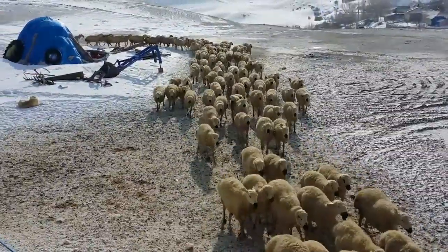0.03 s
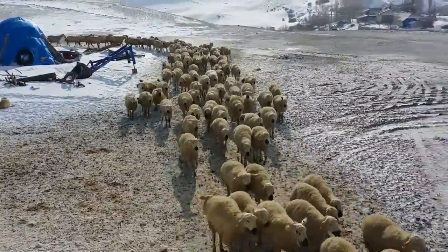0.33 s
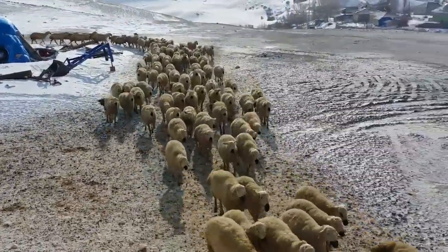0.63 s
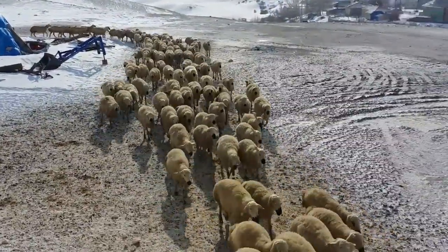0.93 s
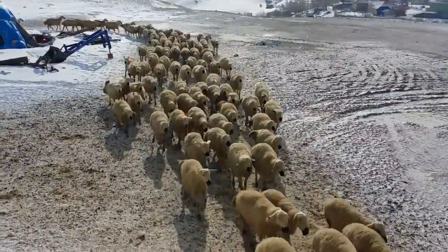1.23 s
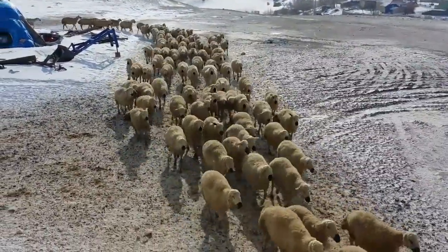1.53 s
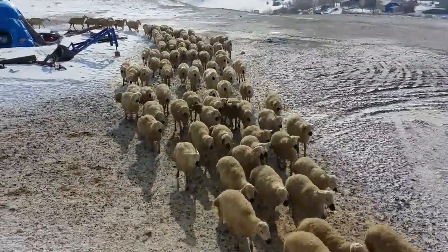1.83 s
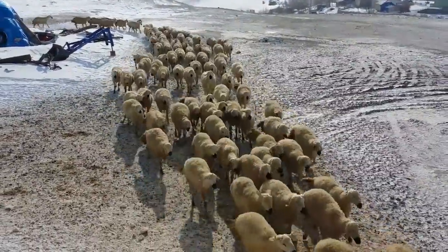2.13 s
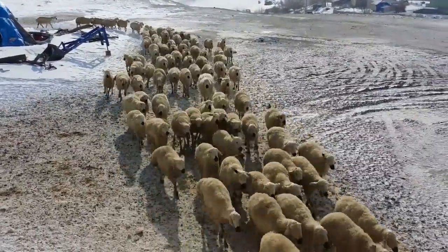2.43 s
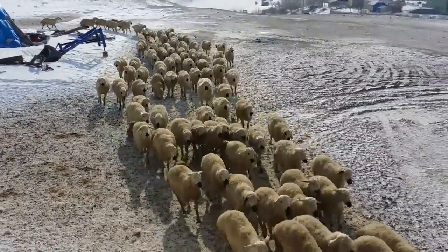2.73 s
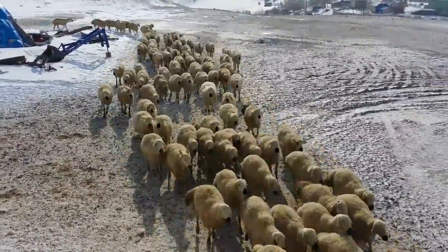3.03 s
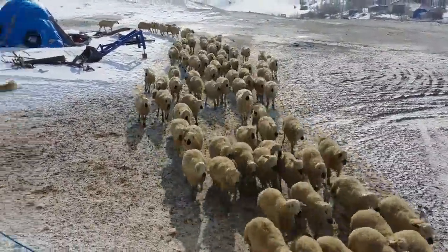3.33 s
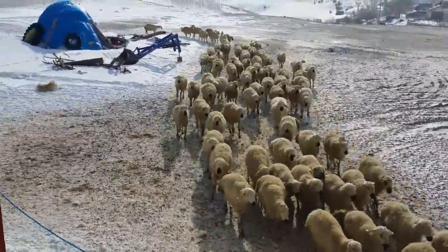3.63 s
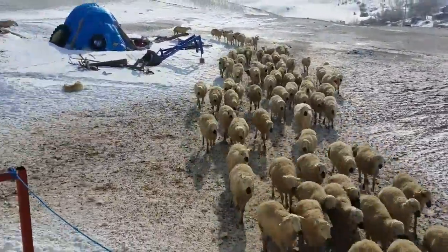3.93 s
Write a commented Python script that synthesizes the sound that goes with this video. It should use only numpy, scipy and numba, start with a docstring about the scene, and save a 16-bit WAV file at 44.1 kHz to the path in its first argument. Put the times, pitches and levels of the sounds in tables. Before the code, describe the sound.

A large flock of sheep walks over frosty, gritty ground for four seconds, making a steady dull patter with a fine crunch and hiss. Closer hooves knock, scuff or flick a stone, mostly between 0.5 and 1 second and again near 3 seconds. Wind rumbles unevenly on the microphone throughout, gusting hard at about 1 second, easing around 2.5 seconds and buffeting again from 3 seconds.

```python
"""Wind rumbles on the microphone while a large flock of sheep patters past on gritty, frosty ground.
Hundreds of hooves merge into a dull patter, a crunch and a fine hiss of crushed grit.
A few near hooves knock, drag or flick a stone. The wind buffets the left and right microphone
openings separately, brighter as it blows harder, with one strong gust near 1 s."""
import sys
import numpy as np
from scipy import signal
from scipy.fft import rfft, irfft
from scipy.io import wavfile
from scipy.ndimage import uniform_filter1d
from numba import njit

SR = 44100
rng = np.random.default_rng(int(sys.argv[2]) if len(sys.argv) > 2 else 0)


def dump(signal):
    """Clip the signal to [-1, 1] and save it as 16-bit WAV at the path in sys.argv[1]."""
    limited = np.clip(np.atleast_2d(signal).T, -1, 1)
    pcm = np.round(limited * 32767).astype(np.int16)
    wavfile.write(sys.argv[1], SR, pcm)


N = 176400  # 4 seconds


def undb(db):
    """Turn decibels into a number to multiply a sound by."""
    return 10 ** (np.asarray(db) / 20)


def unit(x):
    """Scale a signal to an average strength (rms) of 1."""
    return x / np.sqrt(np.mean(x ** 2))


def curve(table):
    """Join rows of (time_s, value) with straight lines."""
    times, values = np.array(table).T
    return np.interp(np.arange(N) / SR, times, values)


def pan(db):
    """Left and right gains with the same total power; positive db leans left."""
    gains = undb(np.array([[.5], [-.5]]) * db)
    return gains / np.sqrt(np.mean(gains ** 2, axis=0))


def colour(x, points):
    """Shape a sound's bass and treble with rows of (pitch_hz, level_db), then scale it to rms 1."""
    hz, db = np.array(points).T
    freqs = np.maximum(np.arange(N // 2 + 1) * SR / N, 1)
    octaves_outside = np.maximum(np.log2(freqs / hz[-1]), 0) + np.maximum(np.log2(hz[0] / freqs), 0)
    gain_db = np.interp(np.log(freqs), np.log(hz), db) - 20 * octaves_outside
    return unit(irfft(rfft(x) * undb(gain_db), N))


def smooth(x, span):
    """Average over span samples, twice."""
    return uniform_filter1d(uniform_filter1d(x, span), span)


def drift(rate_hz):
    """A smooth random wobble, about 1 in size."""
    span = max(int(SR / rate_hz), 2)
    steps = np.repeat(rng.standard_normal(N // span + 1), span)
    return unit(smooth(steps, span)[:N])


def add(out, start_s, sound):
    """Mix a stereo sound in at a given time."""
    i = max(int(start_s * SR), 0)
    out[:, i:i + sound.shape[1]] += sound[:, :N - i]


def stereo(three, shared):
    """Blend one common and two separate signals; shared is the common part of the power."""
    return np.sqrt(shared) * three[0] + np.sqrt(1 - shared) * three[1:]


def band_noise(hz, width, shared):
    """A quarter second of stereo noise around one pitch; more width spreads it further."""
    edges = np.minimum(hz * np.exp(np.array([-.5, .5]) * width), SR / 2 - 1)
    band = signal.butter(2, edges, "band", fs=SR, output="sos")
    noise = signal.sosfilt(band, rng.standard_normal((3, SR // 2)))
    return unit(stereo(noise[:, SR // 4:], shared))


@njit
def lowpass(x, hz):
    """Muffle a sound above a moving pitch (a two-pole filter)."""
    y, band_state, low_state = np.empty(len(x)), 0., 0.
    for i in range(len(x)):
        step = np.tan(np.pi * hz[i] / SR)
        band = (band_state + step * (x[i] - low_state)) / (1 + step * (step + 1.3))
        y[i] = low_state + step * band
        band_state, low_state = 2 * band - band_state, 2 * y[i] - low_state
    return y


# How hard the wind blows: time_s, level_db
WIND_LEVEL = [(0, -37), (.07, -34), (.3, -33.5), (.6, -34.5), (.72, -31.5), (.81, -29.5), (.88, -33.5),
              (.935, -26), (.96, -31.5), (.99, -20.5), (1.03, -29), (1.16, -30), (1.24, -34.5), (1.4, -36),
              (1.46, -33.5), (1.82, -35), (1.9, -33), (2.1, -35.5), (2.4, -35), (2.47, -42.5), (2.72, -42),
              (2.86, -36.5), (3.0, -32), (3.14, -35.5), (3.31, -32.5), (3.48, -31), (3.65, -35),
              (3.87, -33), (4.0, -37.5)]
# Which side it presses harder: time_s, left_minus_right_db
WIND_SIDE = [(0, -1.5), (.55, 3), (.78, 3), (.95, -0.5), (1.15, 1.5), (1.7, -0.5), (2.5, 9.5), (3.2, 0),
             (4.0, 4.5)]
# Tone of the rumble before muffling: pitch_hz, level_db
WIND_COLOUR = [(18, -29), (30, -16), (45, -4.5), (85, 1), (160, -1), (300, -1.5), (700, -24), (2000, -24)]

def wind():
    """Air swirls at each microphone opening: the harder it blows, the louder and brighter the rumble."""
    reference_db, reference_hz, octaves_per_db = -29, 251, 0.17
    sides = []
    for side_gain in pan(curve(WIND_SIDE)):
        swirl_db = 3.5 * np.tanh(drift(rate_hz=45))
        db = curve(WIND_LEVEL) + 20 * np.log10(side_gain) + swirl_db
        cutoff_hz = np.clip(reference_hz * 2 ** (octaves_per_db * (db - reference_db)), 20, SR / 10)
        noise = colour(rng.standard_normal(N), WIND_COLOUR)
        rumble = lowpass(lowpass(noise, cutoff_hz), cutoff_hz)
        strength = np.sqrt(smooth(rumble ** 2, int(.045 * SR)))
        sides.append(rumble / strength * undb(db + 3.5))  # even it out, then set its level
    return np.array(sides)


# Single hard swirls of air hitting the microphone: middle_s, level_db, left_minus_right_db
BUFFETS = [(.144, -18.5, -23), (.252, -14.5, -11), (.455, -17, 19), (.661, -18, 17), (.693, -16.5, 17),
           (.767, -18.5, 7), (.809, -13.5, 7), (.849, -17, 17), (.917, -14.5, -28), (.929, -11, -23),
           (.977, -9.5, -28), (.99, -14.5, 24), (1, -9.5, -38), (1.01, -12.5, 1), (1.049, -13, -15),
           (1.076, -13.5, 23), (1.104, -15, 26), (1.143, -16, 0), (1.326, -17.5, 14), (1.468, -20.5, 6),
           (1.551, -21, -8), (1.728, -18, 7), (1.868, -18.5, 26), (1.895, -14.5, 32), (1.918, -16.5, 23),
           (2.247, -21, 22), (2.381, -20.5, 22), (2.425, -15.5, 29), (2.628, -20.5, 32), (3.03, -13, 20),
           (3.198, -13, 38), (3.305, -15, 22), (3.433, -18, 23), (3.469, -19.5, -5), (3.561, -17.5, 19),
           (3.677, -15, 24), (3.702, -13.5, 15), (3.749, -14.5, -5), (3.811, -15, 9), (3.887, -16.5, 12)]

def buffets():
    """Each hard swirl is a quick push and pull of air; stronger ones are faster and steeper."""
    reference_db, reference_hz, octaves_per_db = -19, 90, 0.1374
    swell_s, steepness = 0.0052, 2.07
    out, half = np.zeros((2, N)), SR // 40
    t = np.arange(-half, half) / SR
    swell = np.exp(-(t / swell_s) ** 2)
    for (middle_s, db, pan_db), turn in zip(BUFFETS, rng.random(len(BUFFETS))):
        hz = reference_hz * 2 ** (octaves_per_db * (db - reference_db))
        phase = 2 * np.pi * (hz * t + turn)
        bend = steepness * undb(db) * swell * np.sin(phase)
        push = swell * np.sin(phase + bend)
        add(out, middle_s - half / SR, undb(db + .5) * pan(pan_db) * push)
    return out


def knocks(table, gain_db, attack_s, decay_s, width, pan_db):
    """Short, dead hits: bursts of noise, each around its own pitch."""
    out, t = np.zeros((2, N)), np.arange(SR // 4) / SR
    shape = np.minimum(t / attack_s, 1) * np.exp(-t / decay_s)
    for start_s, db, hz in table:
        knock = unit(band_noise(hz, width, shared=0.96) * shape) * np.sqrt(np.mean(shape ** 2))
        add(out, start_s, knock * undb(db + gain_db) * pan(pan_db))
    return out


# Small stones clicking: start_s, level_db, pitch_hz
STONES = [(.5741, -31.5, 4870), (1.0116, -31, 4000), (3.083, -36, 7000)]

def stone_clicks():
    """A stone flicked by a hoof gives a tiny, bright click."""
    return knocks(STONES, gain_db=-5, attack_s=0.0011, decay_s=0.0037, width=0.6, pan_db=-1)


def drag(length_s):
    """Pressure of a sliding hoof: it peaks a third of the way into length_s, then eases off."""
    age = np.arange(SR // 4) / SR / length_s * 3
    return age * np.exp(1 - age)


# Hooves dragging through grit: start_s, level_db, length_s, pitch_hz
SCUFFS = [(0.0, -45.5, 0.086, 1810), (0.91, -44, 0.032, 1830), (2.763, -44, 0.092, 1950),
          (3.037, -47.5, 0.1, 1820), (3.427, -42, 0.032, 1900)]

def hoof_scuffs():
    """A dragged hoof makes a narrow rasp with a softer, lower body."""
    out = np.zeros((2, N))
    for start_s, db, length_s, hz in SCUFFS:
        rasp = band_noise(hz, width=0.21, shared=0.19)
        body = undb(-6) * band_noise(hz=1320, width=0.72, shared=0.62)
        add(out, start_s, (rasp + body) * drag(length_s) * undb(db) * pan(4))
    return out


# Hooves crushing frozen grit: start_s, level_db, length_s
SWISHES = [(0, -40.5, .02), (0.633, -51.5, 0.073), (0.908, -49, 0.031), (1.144, -47.5, .07),
           (1.49, -50, 0.059), (1.54, -48, 0.063), (3.034, -45.5, 0.069), (3.44, -49, 0.04),
           (3.598, -51, 0.073)]

def frost_swishes():
    """Frozen grit gives way under a hoof with a crisp swish."""
    out = np.zeros((2, N))
    for start_s, db, length_s in SWISHES:
        swish = band_noise(hz=4350, width=0.4, shared=0)
        fizz = undb(-5.5) * band_noise(hz=9000, width=1.0, shared=0)
        add(out, start_s, (swish + fizz) * drag(length_s) * undb(db) * pan(-1))
    return out


# Near hooves striking the ground: start_s, level_db, pitch_hz
HOOVES = [(0.034, -32.5, 1290), (0.387, -35, 1100), (0.574, -27.5, 1530), (0.8, -31, 555),
          (0.834, -37.5, 950), (0.883, -30.5, 1600), (0.92, -30, 1830), (2.057, -34, 1130),
          (2.165, -39, 1200), (2.191, -39, 1230), (2.439, -35, 1140), (3.033, -26, 1590), (3.52, -37, 835),
          (3.812, -41, 900)]

def hoof_knocks():
    """A near hoof lands with a knock, and the ground damps its treble."""
    hits = knocks(HOOVES, gain_db=-1.84, attack_s=0.002, decay_s=0.0063, width=0.67, pan_db=4)
    damped_above_hz = 1980
    return signal.sosfilt(signal.butter(4, damped_above_hz, fs=SR, output="sos"), hits)


def grains(rate_hz, spread_db, decay_s, shared):
    """A crowd of tiny noise bursts of unequal size, at random times."""
    hits = rng.random((3, N)) < rate_hz / SR
    sizes = undb(spread_db * np.minimum(rng.standard_normal((3, N)), 2))
    fade = np.exp(-2 * np.arange(N) / SR / decay_s)
    power = np.maximum(irfft(rfft(hits * sizes ** 2) * rfft(fade), N), 0)  # each hit gets a fading tail
    return stereo(unit(np.sqrt(power) * rng.standard_normal((3, N))), shared)


# How loud the trampling, the crunch of grit and the finest hiss are: time_s, level_db
PATTER_LEVEL = [(0, -45.5), (.15, -49.5), (4, -49.5)]
CRUNCH_LEVEL = [(0, -52), (.45, -55), (1.1, -52.5), (1.42, -54.5), (1.65, -51.5), (1.95, -54), (2.3, -53),
                (4, -52)]
HISS_LEVEL = [(0, -53), (.43, -55), (.68, -50), (.77, -55.5), (.94, -53), (.98, -58.5), (1.05, -52.5),
              (1.9, -54), (2.65, -50), (2.82, -55), (2.86, -51.5), (3.35, -51.5), (3.66, -47), (3.75, -51)]
# Tone of the same three layers: pitch_hz, level_db
PATTER_COLOUR = [(100, 7.5), (300, 10.5), (520, 3.5), (680, 1.5), (1000, -1.5), (1550, -3), (2050, -2.5),
                 (2500, -11), (3500, -17), (7000, -69)]
CRUNCH_COLOUR = [(1500, -4.5), (3100, -8.5), (3750, -3), (4700, 0.2), (5600, -4.5), (7000, -12),
                 (10000, -17)]
HISS_COLOUR = [(3000, 3), (6000, 3.5), (8000, -0.5), (9700, -0.5), (11500, 2), (13500, 0.5), (16000, 0.5)]

def flock():
    """Countless steps merge into a dull patter; the crunch and hiss of grit flutter together."""
    patter = colour(grains(rate_hz=520, spread_db=5, decay_s=0.009, shared=0.52), PATTER_COLOUR)
    crunch = colour(grains(rate_hz=1800, spread_db=4, decay_s=0.0033, shared=0.034), CRUNCH_COLOUR)
    hiss = colour(grains(rate_hz=4900, spread_db=4, decay_s=0.0045, shared=0), HISS_COLOUR)
    flutter_db = 0.88 * drift(rate_hz=18)
    patter *= pan(2) * undb(curve(PATTER_LEVEL) + 4.5)
    crunch *= pan(-1) * undb(curve(CRUNCH_LEVEL) + 4 + flutter_db)
    hiss *= pan(-2) * undb(curve(HISS_LEVEL) + 4 + flutter_db)
    return patter + crunch + hiss


def scene():
    """The flock in open air, with wind on the microphone."""
    sheep = hoof_knocks() + stone_clicks() + flock() + hoof_scuffs() + frost_swishes()
    return sheep + wind() + buffets()


def record(dry):
    """Cut off the very highest treble."""
    top_hz = 15600
    return signal.sosfilt(signal.ellip(10, .1, 80, top_hz, fs=SR, output="sos"), dry)


dry = scene()
out = record(dry)
dump(out)
```